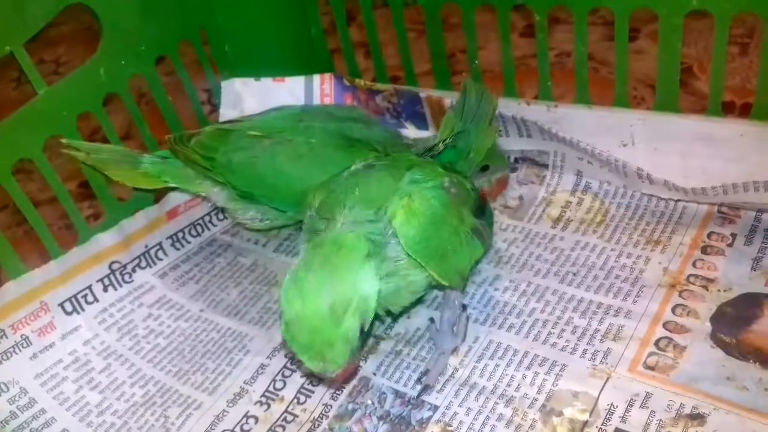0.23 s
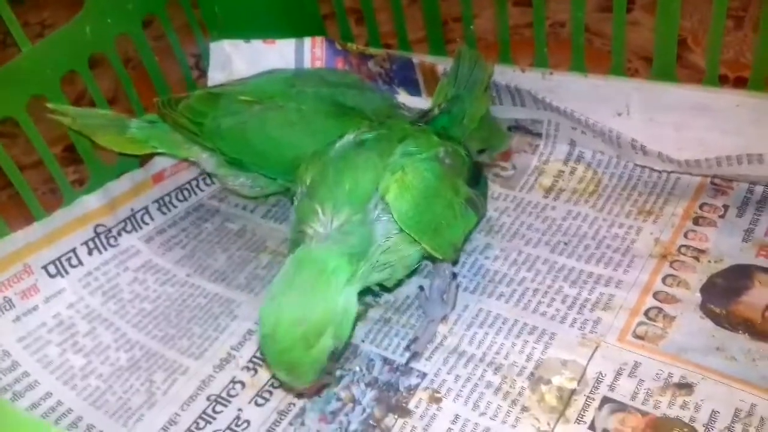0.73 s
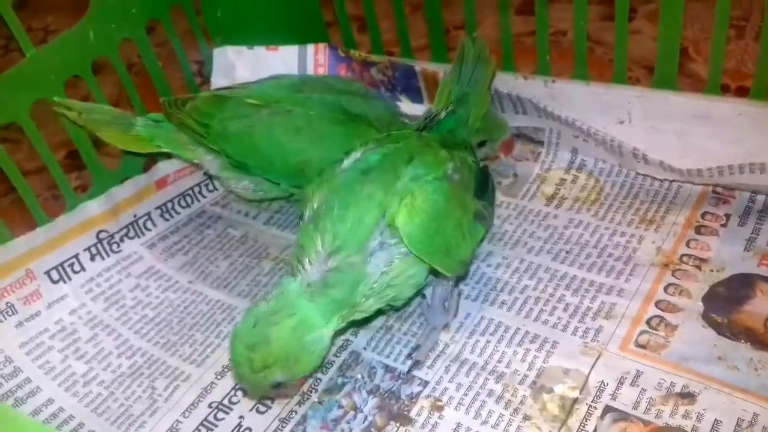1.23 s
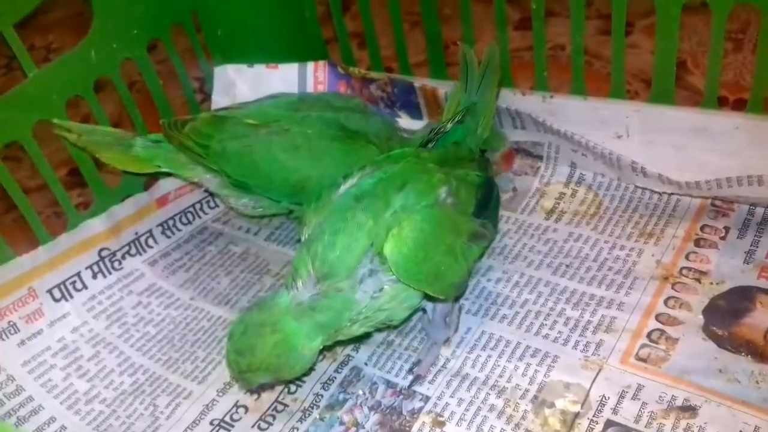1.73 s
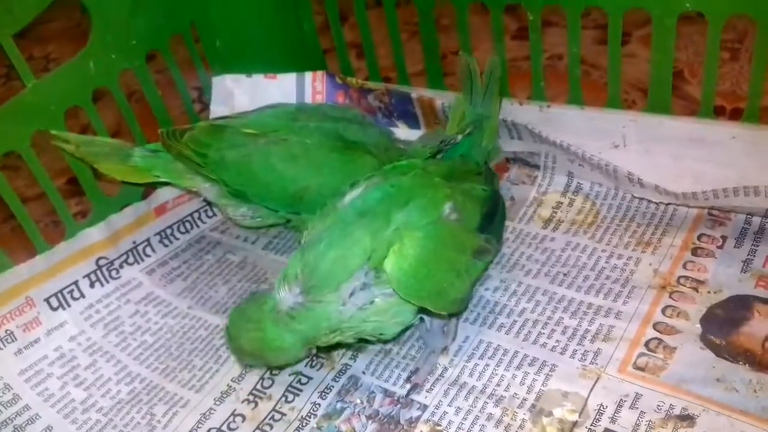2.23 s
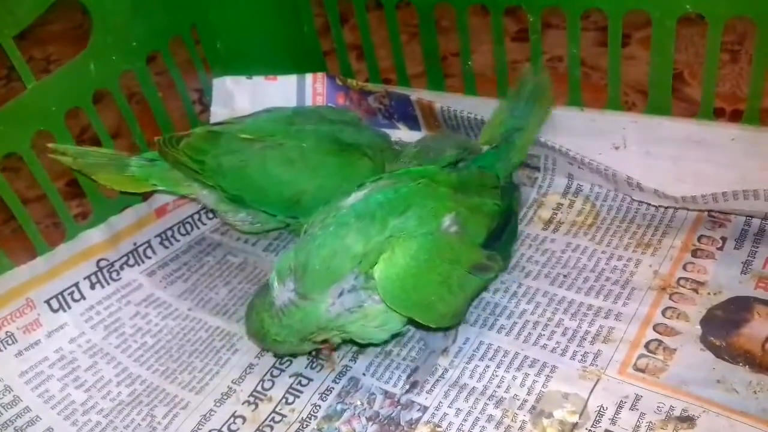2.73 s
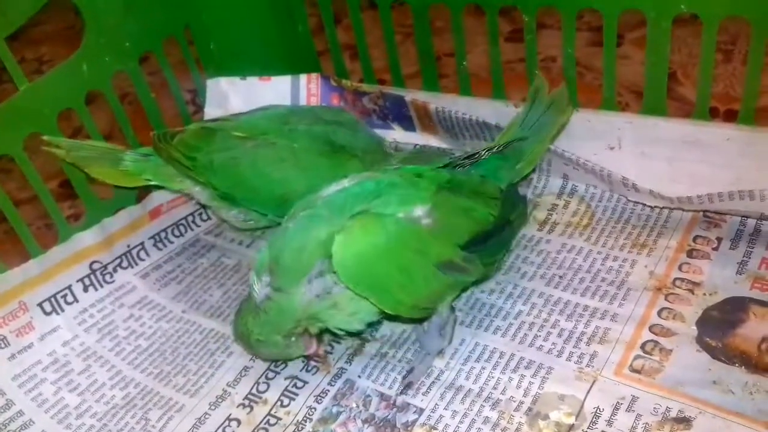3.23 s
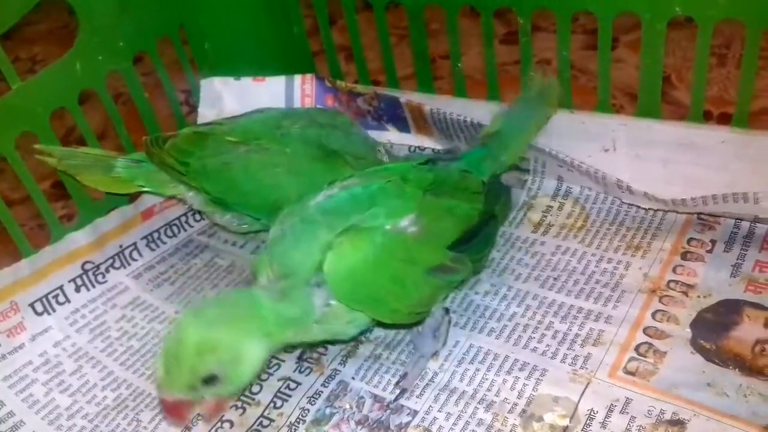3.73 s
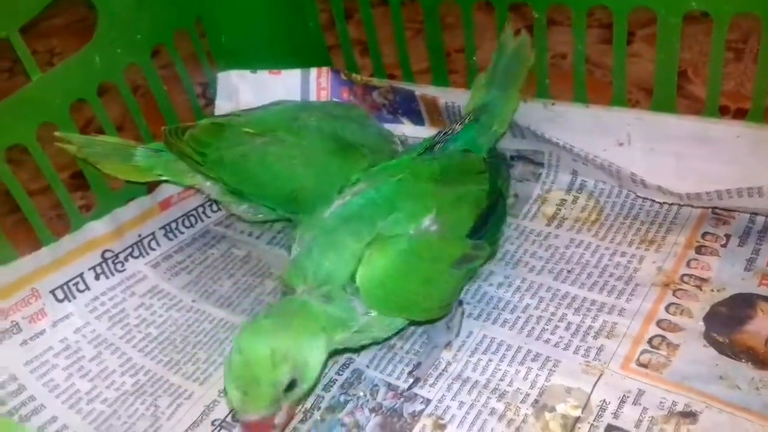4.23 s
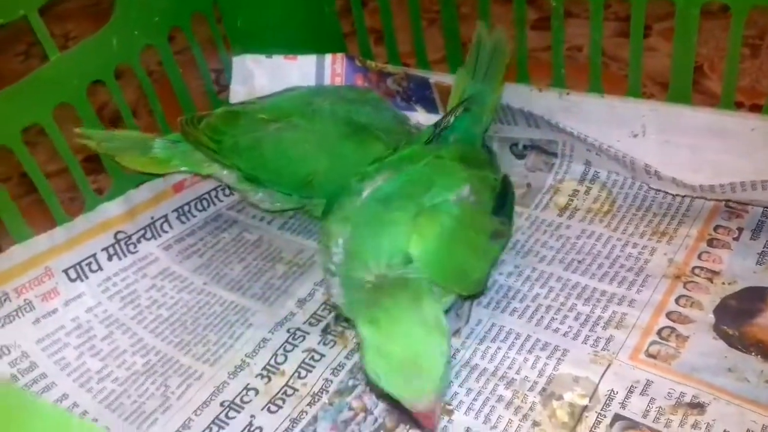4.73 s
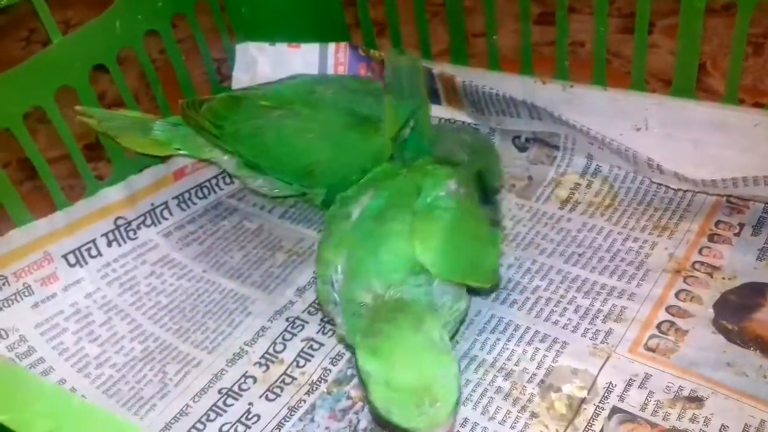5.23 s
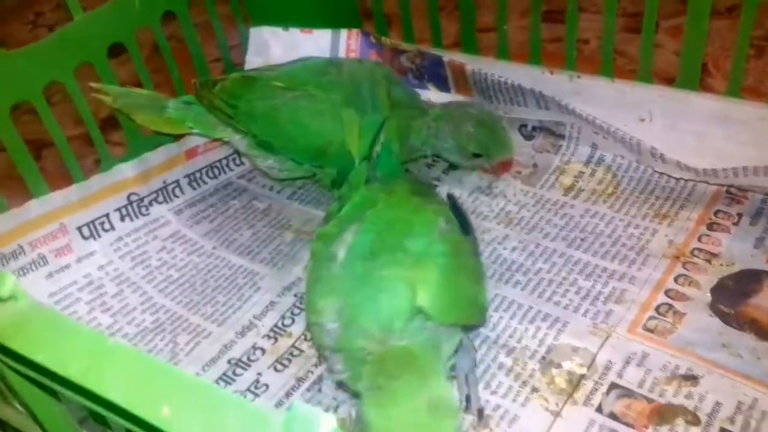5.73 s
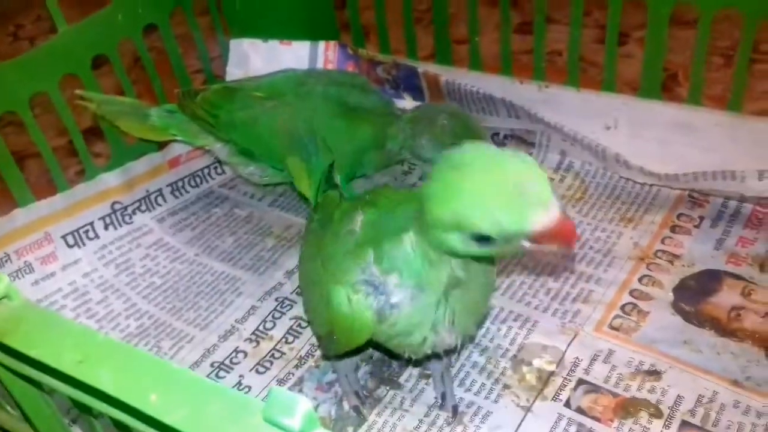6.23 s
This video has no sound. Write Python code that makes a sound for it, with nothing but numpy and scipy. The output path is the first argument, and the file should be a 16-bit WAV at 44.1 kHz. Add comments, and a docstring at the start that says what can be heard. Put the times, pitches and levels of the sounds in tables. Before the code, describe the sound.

Close phone pickup in a hard indoor room. Light ticks of claws on paper and faint distant tones sit over soft air noise. A baby parakeet utters a muffled run of six squawks, rests about a second with more paper ticks, then launches a bright, piercing, evenly paced series that grows until the peaks sound slightly overloaded. Low basket knocks join near the end, and the calls continue to the finish.

```python
"""Faint far tones and claw ticks on newspaper come first, over street rumble and a fan of two beating tones.
From 1.3 s a young parakeet in a plastic basket begs close to a phone in a run of six short, soft squawks.
From 3.3 s it faces the phone for a longer, louder run; from 5.2 s the basket also knocks.
Each squawk is a stack of harmonics that shoots up, drops to a knee and sags; echoes of a hard room follow.
The loudest squawks overload the recorder, which rounds their peaks and adds a low thump."""
import sys
import numpy as np
from scipy import signal
from scipy.fft import rfft, irfft, next_fast_len
from scipy.io import wavfile
from scipy.ndimage import uniform_filter1d, map_coordinates

SR = 44100
rng = np.random.default_rng(int(sys.argv[2]) if len(sys.argv) > 2 else 0)


def wav_out(sig):
    """Save sig, one row per channel (or a flat mono array), as 16-bit PCM at SR to the path in sys.argv[1]."""
    wavfile.write(sys.argv[1], SR, np.round(np.clip(np.atleast_2d(sig).T, -1, 1) * 32767).astype(np.int16))


N = 286209


def amp(db):
    """Decibel law: twenty decibels are a factor of ten in amplitude."""
    return 10 ** (np.asarray(db) / 20)


def unit(x):
    """Normalisation by root mean square: x at rms 1."""
    return x / np.sqrt(np.mean(x ** 2) + 1e-20)


def along(points, hz):
    """Logarithmic frequency scale: (Hz, value) points interpolated on a log axis."""
    f, v = np.transpose(points)
    return np.interp(np.log(hz + 1), np.log(f + 1), v)


def wobble(rate, size):
    """Slow random modulation: a smooth curve through rate random knots a second."""
    knots = rng.standard_normal(int(size * rate / SR) + 4)
    return map_coordinates(knots, [np.arange(size) * rate / SR])


def filtered(x, response):
    """Linear filtering: the spectrum of x times a response of frequency."""
    m = next_fast_len(x.shape[-1] + 8192)
    spectrum = rfft(x, m) * response(np.fft.rfftfreq(m, 1 / SR))
    return irfft(spectrum, m)[..., :x.shape[-1]]


def add(track, s, sound):
    """Superposition: mixes a sound into the track at s seconds."""
    part = track[round(s * SR):][:len(sound)]
    part += sound[:len(part)]


# Throat and beak resonance with the head tucked away, then with the beak facing the phone.
# Each row: frequency in Hz, level in dB.
AWAY_RESONANCE = [(400, -13), (700, -1), (1100, -3), (2300, -1), (3400, -13), (4500, -9), (5000, -19),
                  (5600, -32), (6500, -20.5), (7400, -22), (9000, -29.5), (10500, -27), (12000, -35),
                  (15000, -54)]
FACING_RESONANCE = [(400, -29.5), (700, -8), (1050, -8.5), (1400, -10), (2000, -4.5), (3000, -10),
                    (3800, 0), (4400, -6.5), (5100, -10.5), (5700, -12.5), (6500, -15.5), (7500, -13.5),
                    (8700, -23), (10200, -15.5), (11400, -29), (15000, -35)]
# What all squawks of a run share, soft run then loud run. Each row: start pitch over shoulder pitch (ratio),
# knee, sag and end pitch in Hz, rise, knee and end levels against the tail in dB, treble weight when warm in dB,
# how much duller at first in dB, warming time constant in s.
RUN_VOICES = [(0.66, 1240, 1183, 866, -4, 0, 0.77, -1.99, 6.88, 0.307),
              (0.35, 1158, 1012, 900, -3, 0.534, -1.01, -0.583, 12.96, 0.212)]
# Times from which the two voices warm up, in s.
RUN_STARTS_S = 1.299, 3.305
# One upward crack of the voice: time in s, jump in Hz, width in ms, loss in dB.
VOICE_CRACK = (3.346, 810, 3.4, 14.6)
TURNS_S = 3  # later squawks face the phone
CEILING_HZ = 1912  # the voice flattens out at the top of its range


def squawk(row, breath_db=-18, rasp_db=10, purity_db=14):
    """Source and filter: syrinx harmonics and breath noise, both coloured by the throat and beak."""
    s, t1, hz1, t2, hz2, t3, t4, crest_db, tail_db = row
    away = s < TURNS_S
    loud = not away
    start, hz3, sag_hz, hz4, rise_db, knee_db, end_db, warm_db, dull_db, warm_s = RUN_VOICES[loud]
    treble_db = warm_db - dull_db * np.exp(-(s - RUN_STARTS_S[loud]) / warm_s)
    ms = np.arange(round((t4 + 6) * SR / 1000)) * 1000 / SR
    size = len(ms)

    # pitch: up over the shoulder to a rounded crest, down to the knee, then a sag
    pitch_ms = [0, t1, t2 - 0.3088 * (t2 - t1), t2, t2 + 0.1986 * (t3 - t2), t3, (t3 + t4) / 2, t4]
    pitch_hz = [start * hz1, hz1, .97 * hz2, hz2, .97 * hz2, hz3, sag_hz, hz4]
    pitch = np.interp(ms, pitch_ms, pitch_hz)
    crack_s, jump_hz, width_ms, loss_db = VOICE_CRACK
    crack = np.exp(-((ms - (crack_s - s) * 1000) / width_ms) ** 2)
    jitter, shimmer_db = .007, 3
    pitch = np.minimum(pitch, CEILING_HZ) + jump_hz * crack
    pitch = uniform_filter1d(pitch, size=220, mode="nearest")  # smoothed over 5 ms
    pitch = pitch * (1 + jitter * wobble(391.6, size))

    level_points_db = [tail_db + rise_db, crest_db, tail_db + knee_db, tail_db + end_db]
    level_db = np.interp(ms, [5, t2, t3, t4 - 5], level_points_db)
    level = amp(level_db - loss_db * crack)
    level *= np.clip(ms / 1.24, 0, 1) * np.clip((t4 + 2 - ms) / 5, 0, 1)
    level *= amp(-3 * loud * np.exp(-ms / 6))  # the loud voice swells in

    gape = 1 + .03 * rng.standard_normal()  # the beak opens a little differently each time
    resonance = AWAY_RESONANCE if away else FACING_RESONANCE

    def colour(hz):
        """Resonance and radiation: throat and beak peaks, and no bass from so small a bird."""
        treble = treble_db * np.clip(0.5434 * np.log2((hz + 1) / 1700), 0, 2)
        radiated = (hz < SR / 2) / (1 + (420 / (hz + 1)) ** 6)
        return amp(along(resonance, hz * gape) + treble) * radiated

    k = np.arange(1, 25)[:, None]  # harmonic numbers
    # the soft voice turns almost pure at high pitch: its upper harmonics fade
    fade_db = away * purity_db * np.clip((pitch - 1280) / 250, 0, 1) * np.clip(k - 2, 0, 3)
    # the treble opens a few ms after the voice starts
    fade_db = fade_db + 10 * np.exp(-ms / 7) * np.clip(k * pitch / 3500 - .6, 0, 1.5)
    # the loud voice puts its crest into the second and third harmonics
    ring_db = loud * 6 * np.clip((pitch - 1500) / 350, 0, 1) * ((k == 2) + 1.103 * (k == 3))
    timbre_db = rng.normal(0, 2, k.shape)  # no two squawks share one timbre
    sizes = colour(k * pitch) * amp(ring_db + timbre_db - fade_db)

    # low harmonics are steadier, high ones come in bursts
    bursts = np.array([wobble(141.1, size) for _ in k])
    flutter = amp(shimmer_db * np.clip(k / 5, 0, 1) * bursts)
    # nearby surfaces add peaks and notches that shift with the head: a harmonic flares as it crosses one
    ripple_db, ripple_hz = 2.2, 300
    ripple = map_coordinates(rng.standard_normal(128), [k * pitch / ripple_hz], mode="nearest")
    flutter *= amp(ripple_db * ripple * np.clip(k * pitch / 2500 - .3, 0, 1) - 0.36)

    phase = 2 * np.pi * np.cumsum(pitch) / SR
    harmonics = sizes * flutter * np.sin(k * phase + 0.811 * k ** 1.7)
    voice = np.sum(harmonics, axis=0) / np.sqrt(np.sum(sizes ** 2, axis=0) / 2)
    # breath pulses with the pitch and is strongest while the voice starts
    pulsed_noise = rng.standard_normal(size) * (1 + 0.93 * np.sin(phase))
    breath = unit(filtered(pulsed_noise, colour))
    onset_db = (rasp_db if away else 3) * np.exp(-ms / 10)
    return level * (voice + amp(breath_db + onset_db) * breath)


# Reverberation of the hard room. Each row: frequency in Hz, time to fall by 60 dB in s.
ROOM_DECAY = [(400, 0.146), (1000, 0.2547), (3000, 0.2672), (8000, 0.2014), (14000, 0.212)]
# Reflections from near walls and floor. Each row: delay in ms, level in dB.
BASKET_ECHOES = [(1.1, -11.5), (2.3, -16), (4.2, -16), (7.5, -30.5), (12, -32.5)]


def room(x, wet_db):
    """Reflection and reverberation: near walls, then a tail in which each frequency dies at its own speed."""
    hz, t, z = signal.stft(rng.standard_normal(SR // 2), SR, nperseg=256)
    decay = amp(-60 * t / along(ROOM_DECAY, hz)[:, None])
    tail = signal.istft(z * decay, SR, nperseg=256)[1]
    tail *= np.clip(np.arange(len(tail)) / SR / 0.00156, 0, 1)  # builds up over 1.56 ms
    echo = amp(wet_db) * tail / np.linalg.norm(tail)
    for ms, db in BASKET_ECHOES:
        echo[round(ms * SR / 1000)] += amp(db)
    return signal.fftconvolve(x, echo)


# The squawks. Each row: start in s, shoulder time in ms and pitch in Hz, crest time in ms and pitch in Hz
# (before the ceiling), knee time in ms, length in ms, crest level in dB, tail level in dB.
SQUAWKS = [(1.299, 17.64, 708.5, 37, 1638, 72, 93.6, -19, -20.5),
           (1.475, 8.45, 649, 20.7, 1538, 26.5, 70.6, -12.5, -18),
           (1.634, 11.8, 766.2, 21.5, 1557, 30.9, 69.4, -16.5, -19),
           (1.796, 10.7, 723.3, 28, 1435, 27.7, 69.7, -13.5, -18),
           (1.954, 18.3, 696.2, 23.7, 1573, 32.6, 72, -15, -17),
           (2.13, 15.4, 650.2, 29, 1583, 30.7, 75.8, -9.5, -17.5),
           (3.306, 11.6, 1322, 36, 1633, 52.5, 85.4, -13, -20),
           (3.457, 14.2, 1402, 27, 1922, 46, 67.14, -14.5, -14.5),
           (3.599, 10.75, 1484, 22.6, 1886, 37.3, 64.4, -11.5, -12),
           (3.743, 14.1, 1587, 17.6, 1915, 35.46, 67.5, -12.5, -11.5),
           (3.893, 13.7, 1462, 22.8, 1936, 36.1, 68, -9.5, -10.5),
           (4.045, 14.27, 1562, 24, 1975, 38.6, 66.45, -8.5, -11),
           (4.197, 11.2, 1588, 24, 1926, 35.8, 68.1, -7, -10.5),
           (4.354, 13.95, 1541, 20.7, 2007, 38.1, 69.45, -7, -11),
           (4.514, 13.14, 1624, 20, 1961, 38.7, 65.6, -7.5, -10.5),
           (4.667, 12.8, 1636, 25.6, 1961, 38.4, 63.56, -7.5, -10),
           (4.824, 11.35, 1627, 22, 1964, 35.94, 68.7, -3, -12),
           (4.981, 9.63, 1592, 19.7, 1945, 34.64, 62.25, -5, -10),
           (5.135, 14, 1684, 23, 1979, 36, 63.9, -5.5, -11),
           (5.291, 10.47, 1768, 18.1, 1996, 33.16, 63.6, -3.5, -11.5),
           (5.446, 11.93, 1752, 18.7, 2017, 36.1, 60.9, -8, -10),
           (5.603, 9.65, 1735, 20.4, 1978, 33.3, 64.46, -4, -10),
           (5.765, 13.32, 1587, 19, 1982, 29.8, 62.7, -7, -10),
           (5.929, 13.5, 1646, 25, 1943, 40, 68.3, -5, -11.5),
           (6.091, 12.1, 1380, 26.3, 1956, 40.3, 67.1, -5.5, -11),
           (6.246, 13.74, 1379, 21.6, 1996, 44.3, 74.1, -6.5, -11.5),
           (6.41, 14.95, 1472, 21.3, 2031, 40.5, 70.9, -6.5, -11.5)]
# How far the echoes differ between the two ports. Each row: frequency in Hz, level in dB.
ECHO_WIDTH = [(300, -24.5), (1000, -66), (2500, -63.5), (4000, -33), (7500, -2), (10000, -13),
              (14000, -46.5)]


def parakeet():
    """Spatial decorrelation: calls and echoes shared by both ports, plus echoes of opposite sign in each."""
    mid, side = np.zeros(N), np.zeros(N)
    for row in SQUAWKS:
        call = squawk(row)
        add(mid, row[0], call)
        add(mid, row[0], room(call, wet_db=-10))
        add(side, row[0], room(call, wet_db=-23))
    side = filtered(side, lambda hz: amp(along(ECHO_WIDTH, hz)))
    return np.array([mid - side, mid + side])


def taps(events, t60, crack):
    """Impact excitation: damped rings with a crack of noise, each followed by the room; t60 in s."""
    out, t = np.zeros(N), np.arange(SR // 8) / SR
    for s, db, hz in events:
        strike = np.sin(2 * np.pi * hz * t) + crack * rng.standard_normal(len(t))
        tap = amp(db - 60 * t / t60) * strike
        add(out, s, tap)
        add(out, s, room(tap, wet_db=0.5))
    return out


# Claws on the paper. Each row: start in s, level before decay and echoes in dB, ring frequency in Hz.
CLAW_TICKS = [(0.336, -40, 802), (0.895, -44.5, 890), (2.4, -45.5, 1150), (2.5238, -41.5, 1060),
              (2.5506, -46, 996), (2.9936, -43.5, 1160), (3.1223, -57, 850), (3.287, -38.5, 960)]


def claws():
    """Heavy damping: paper stops each noisy tick within milliseconds."""
    return taps(CLAW_TICKS, t60=0.0086, crack=0.376)


# Knocks of the basket. Each row: start in s, level before decay and echoes in dB, ring frequency in Hz.
BASKET_BUMPS = [(5.156, -36.5, 316.5), (5.393, -36.5, 315), (5.807, -29.5, 352.6), (5.887, -34, 336),
                (6.371, -29, 341.6), (6.461, -26, 325.5)]


def basket_knocks():
    """Lighter damping: the basket rings lower and longer, with little noise."""
    return taps(BASKET_BUMPS, t60=0.029, crack=.05)


# Faint far tones. Each row: start in s, end in s, mean pitch in Hz, level before swelling in dB.
FAR_TONES = [(.0, 0.039, 705.4, -48.5), (0.592, 0.682, 284, -56), (0.598, .67, 4100, -66),
             (0.617, .68, 4470, -69.5), (.7, 1.15, 3134, -60.5), (3.137, 3.45, 260, -58),
             (3.16, 3.302, 515, -61), (3.593, 3.736, 388.4, -54.5), (4.588, 4.783, 309.6, -55),
             (4.903, 5.148, 290.9, -59.5), (5.391, 5.585, 307, -52.5), (5.676, 5.8, 282.4, -53)]


def faint_tones():
    """Frequency and amplitude modulation: thin, unsteady sines from far away."""
    out = np.zeros(N)
    for start, end, hz, db in FAR_TONES:
        size = round((end - start) * SR)
        pitch = hz * (1 + 0.0057 * wobble(27.9, size))
        swell = amp(db + 4 * wobble(30, size)) * np.hanning(size) ** .4
        add(out, start, swell * np.sin(2 * np.pi * np.cumsum(pitch) / SR))
    return out


# Spectrum shape of street and room air. Each row: frequency in Hz, relative density in dB per Hz.
AIR_SPECTRUM = [(15, -52.5), (25, -11.5), (59, -10.5), (77, -1.5), (203, -1), (232, -4), (356, -4.5),
                (478, -6.5), (775, -3.5), (2880, -15.5), (3210, -14.5), (5070, -23.5), (15200, -29)]
# Side against mid in that air. Each row: frequency in Hz, level in dB.
AIR_WIDTH = [(60, -21.5), (240, -17.5), (940, -14.5), (3730, -6), (14800, 5.5)]
# Course of the air level before its swells. Each row: time in s, level in dB.
AIR_LEVEL = [(0, -54), (1.25, -54.5), (2.5, -53.5), (3.5, -55), (5, -49), (6.49, -49.5)]
# Two motor tones that beat: mean frequency in Hz, beats per second, level before swelling in dB.
FAN = (204.4, 5.2, -57.5)


def background():
    """Noise coherence and beating: patchy air, most alike at both ports in the bass, a fan and hiss."""
    z = signal.stft(rng.standard_normal((2, N)), nperseg=512)[2]
    field = uniform_filter1d(rng.standard_normal(z.shape[1:]), size=6, axis=0)
    field = uniform_filter1d(field, size=12, axis=1)
    patchy_db, swell_db = 1.2, 1.3
    pair = signal.istft(z * amp(patchy_db * unit(field)), nperseg=512)[1][:, :N]
    mid, side = filtered(pair, lambda hz: amp(along(AIR_SPECTRUM, hz) + [0 * hz, along(AIR_WIDTH, hz)]))
    air = unit(np.array([mid + side, mid - side]))
    t = np.arange(N) / SR
    level = amp(np.interp(t, *np.transpose(AIR_LEVEL)) + swell_db * wobble(3.678, N))
    hz, beats, db = FAN
    # a sine times a slow cosine is the sum of two close tones
    beating = np.cos(np.pi * beats * (t - .1)) * np.sin(2 * np.pi * hz * t)
    fan = amp(db + 3.2 * wobble(2.91, N)) * beating
    hiss = amp(-73.5) * rng.standard_normal((2, N))  # each microphone's own noise
    return level * air + fan + hiss


def scene():
    """Superposition of bird, paper, basket, far tones and air."""
    return parakeet() + claws() + basket_knocks() + faint_tones() + background()


TOP_HZ = 15400  # band limit


def record(dry):
    """Saturation and band limiting: peaks round off, the treble is cut and the output sits below zero."""
    clipped = dry / (1 + np.abs(dry / 1.062) ** 12) ** (1 / 12)
    # overload pushes the baseline aside: a low thump under the loudest crests
    thump = amp(-31.5) * filtered(np.abs(dry - clipped), lambda hz: 1 / (1 + (hz / 280) ** 4))
    offset = -.001
    return filtered(clipped - thump, lambda hz: hz < TOP_HZ) + offset


dry = scene()
out = record(dry)
wav_out(out)
```